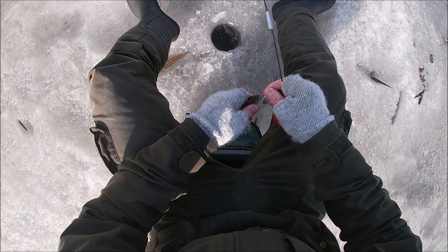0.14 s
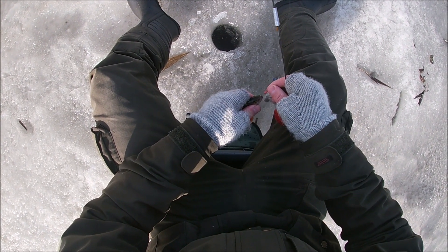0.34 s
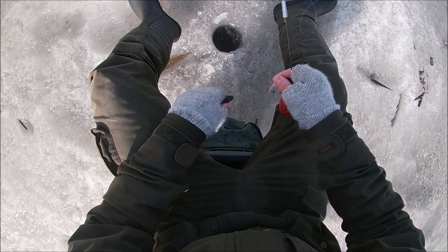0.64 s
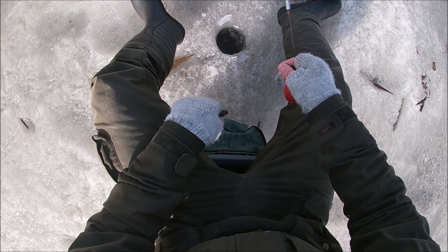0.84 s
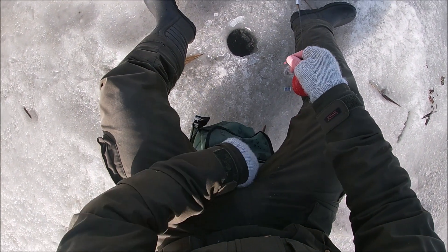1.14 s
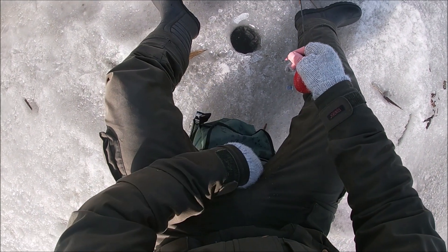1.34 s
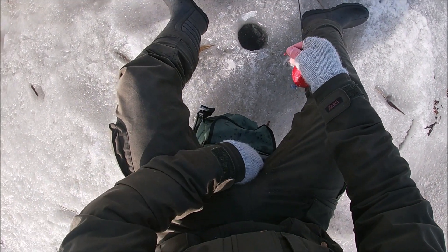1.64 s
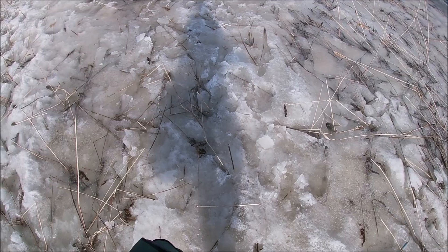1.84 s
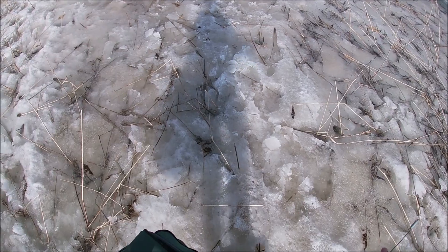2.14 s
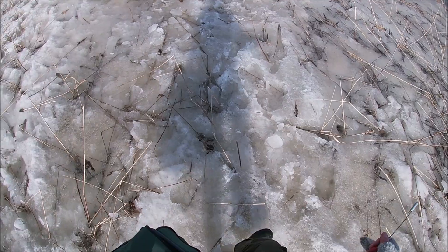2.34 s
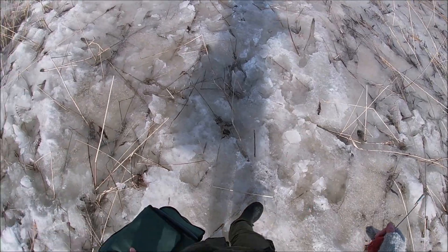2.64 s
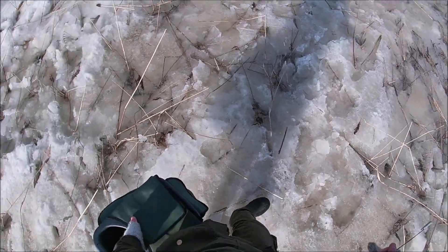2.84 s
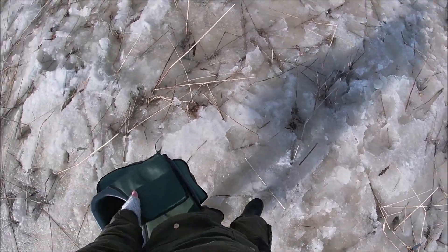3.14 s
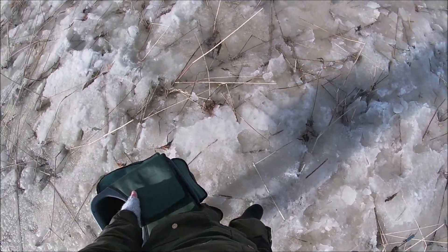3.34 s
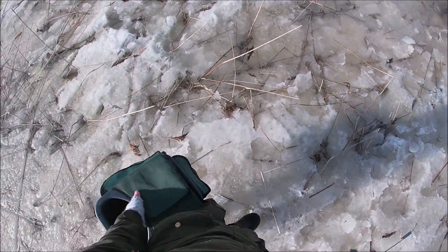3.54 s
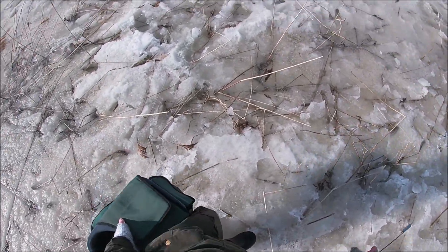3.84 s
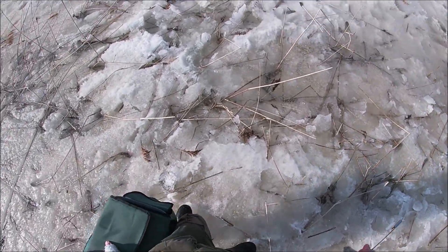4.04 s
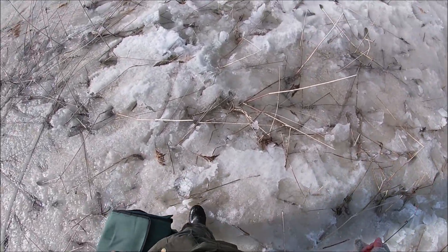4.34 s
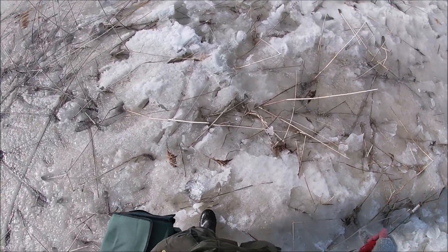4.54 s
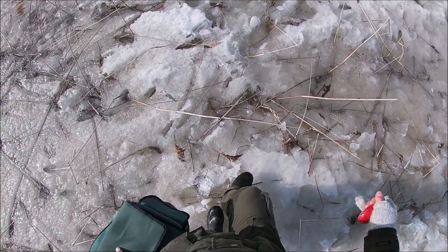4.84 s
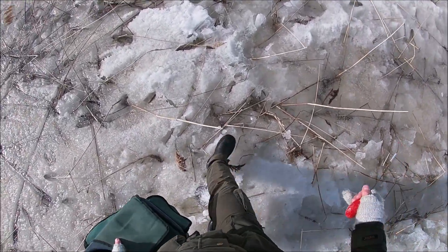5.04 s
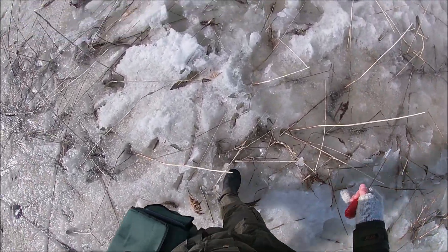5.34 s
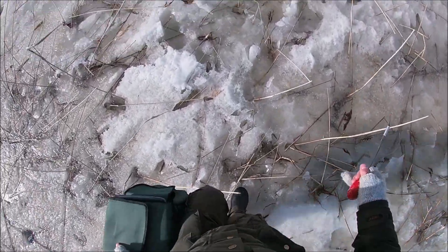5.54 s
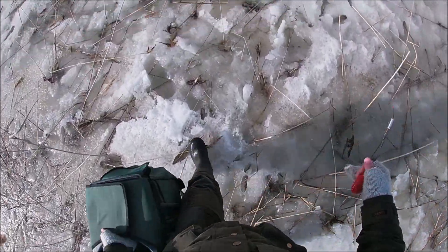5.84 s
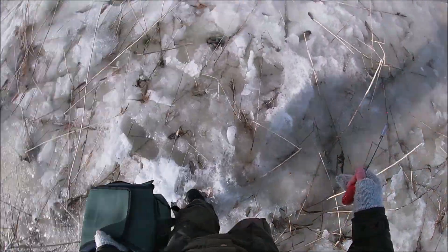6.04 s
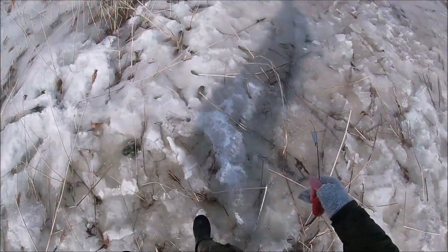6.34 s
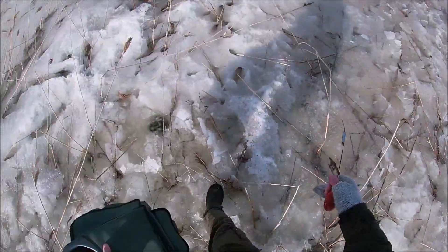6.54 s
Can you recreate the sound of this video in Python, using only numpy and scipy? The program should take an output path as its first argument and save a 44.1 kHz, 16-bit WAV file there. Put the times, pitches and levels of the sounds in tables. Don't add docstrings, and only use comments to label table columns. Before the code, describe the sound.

Close, muffled body-worn sound: soft fidgeting, a tiny gap, then low rumbling steps through crackling icy slush with rustling fabric and dull thumps.

```python
import sys
import numpy as np
from scipy import signal
from scipy.io import wavfile
from scipy.ndimage import uniform_filter1d

SR = 44100
rng = np.random.default_rng(int(sys.argv[2]) if len(sys.argv) > 2 else 0)


def amplitude_ratio(level_db):
    exponent = np.asarray(level_db, float) / 20
    return 10 ** exponent


def dump_mix(stems):
    frames = np.atleast_2d(stems).T
    limited = np.clip(frames, -1, 1)
    pcm = np.round(limited * 32767).astype(np.int16)
    wavfile.write(sys.argv[1], SR, pcm)


N = 295405
WALK_START_S = 1.764

# pitch in Hz, level in dB per Hz.
HISS_TONE = [(60, -5), (1000, -8), (1330, -1), (1700, -14), (6000, -14), (7500, -33), (9500, -19),
             (15000, -38)]
# time in seconds, peak in dB.
TICK_LEVELS = [(0, -67.5), (1.7, -70.5), (1.8, -96.5), (4, -70), (6.7, -74.5)]
# pitch in Hz, level in dB per Hz.
SLUSH_TONE = [(2500, -20.5), (3600, 1.5), (4100, 1.5), (4700, -2.5), (5200, -2.5), (6100, -6.5),
              (6800, -37), (9000, -59)]
# pitch in Hz, level in dB per Hz.
SPRAY_TONE = [(5500, -28), (7000, -3.5), (8000, 2.5), (9000, -5), (10000, -8), (11000, -14), (13000, -30),
              (15000, -57)]
# start in seconds, hold in seconds,
# crushing in dB, fine spray in dB.
CRUNCHES = [(0, 1.05, -93, -89.5), (1.1, .15, -81.5, -86), (1.3, .39, -97, -88), (1.77, .75, -77.5, -107),
            (2.46, 0.023, -74, -100), (2.7, .03, -76.5, -94), (3.225, 0.025, -73.5, -83.5),
            (3.44, .04, -73.5, -81.5), (3.48, 0.034, -67.5, -78), (3.6, .5, -80, -92.5),
            (4.18, 0.13, -75, -87), (4.34, 0.043, -70.5, -82.5), (4.47, 0.045, -67, -83),
            (4.55, .7, -82.5, -88), (5.25, .02, -68, -85), (5.275, 0.014, -52, -62),
            (5.31, 0.031, -61.5, -73), (5.38, 0.3, -74, -83), (5.535, 0.036, -68, -76),
            (5.71, .015, -72.5, -77), (5.784, 0.0077, -57, -64.5), (5.83, 0.06, -66.5, -82),
            (5.93, 0.034, -56, -67), (5.965, 0.033, -52, -62.5), (6.01, 0.053, -58, -67),
            (6.09, 0.014, -59.5, -76), (6.13, 0.11, -74.5, -84.5), (6.5, 0.004, -70, -72),
            (6.575, .13, -62, -70.5)]
# time in seconds, peak in dB, brightness in dB.
SNAPS = [(0.0696, -46, -26), (1.1029, -43.5, -39), (1.1846, -48, -19.5), (1.444, -45, -30),
         (1.4745, -43, -25), (2.2142, -34, -30), (2.6254, -48, -19), (2.75, -50, -36), (3.2284, -42.5, -19),
         (3.5019, -41, -15), (3.6895, -38.5, -13), (3.7557, -37, -14.5), (3.8273, -26, -31),
         (3.874, -26.5, -23), (4.0124, -40, -12), (4.172, -28.5, -19), (4.368, -34.5, -22),
         (4.8059, -31, -43), (5.2733, -40, -18.5), (5.2857, -27.5, -31), (5.4054, -33, -22),
         (5.5128, -30.5, -37), (5.6042, -36, -23), (5.784, -40, -5), (5.8707, -43.5, -18),
         (5.9198, -51, -16), (5.9433, -26, -26), (6.495, -50.5, -13), (6.561, -50.5, -5), (6.5808, -50, -4)]
# pitch in Hz, level in dB per Hz.
HEAVE_TONE = [(8, -45), (16, -4), (33, 6), (55, 0), (75, -23.5), (120, -45.5), (300, -68)]
# pitch in Hz, level in dB per Hz.
BUMP_TONE = [(35, -21.5), (62, -2.5), (90, -8.5), (125, -16), (200, -32.5)]
# pitch in Hz, level in dB per Hz.
SHUFFLE_TONE = [(90, -26.5), (145, 0), (220, -2), (350, -6), (520, -17), (720, -13), (880, -20.5),
                (1500, -32)]
# start in seconds, hold in seconds, heave in dB, bumps in dB.
SEATED_SHIFTS = [
    (0, 4, -46.5, -62.5),
    (.22, 0.33, -63, -51.5),
    (.64, 0.05, -39, -49.5),
    (.8, 0.027, -41, -62.5),
    (1.05, 0.024, -36, -56),
    (1.3, 0.067, -44, -58.5),
    (1.44, 0.058, -43, -45.5),
    (1.63, 0.077, -37, -42),
]
# start in seconds, hold in seconds, heave in dB, bumps in dB.
WALKING_LURCHES = [(1.745, .25, -35.5, -30.5), (2.031, .12, -30, -28.5), (2.192, 0.021, -24, -29.5),
                   (2.24, .25, -36.5, -28), (2.526, .23, -27, -28), (2.83, .13, -35.5, -51.5),
                   (3.0, 0.36, -45.5, -59.5), (3.25, 0.047, -30.5, -53), (3.438, 0.047, -26, -38),
                   (3.492, 0.087, -25, -39), (3.63, 0.39, -32.5, -37), (3.794, 0.095, -30.5, -34),
                   (3.973, .15, -40, -36), (4.158, 0.086, -31.5, -35.5), (4.295, 0.14, -27.5, -44.5),
                   (4.475, .35, -33, -44.5), (4.86, 0.16, -28.5, -39.5), (4.988, 0.17, -47, -42),
                   (5.176, 0.05, -23, -41), (5.299, 0.13, -20.5, -36.5), (5.45, 0.25, -39, -48.5),
                   (5.602, 0.038, -32.5, -46), (5.734, 0.035, -45, -43.5), (5.799, .05, -19.5, -43.5),
                   (5.935, 0.065, -18, -32.5), (6.011, .08, -18.5, -37), (6.168, 0.073, -29.5, -43),
                   (6.27, 0.33, -46, -69), (6.606, 0.059, -17, -47.5)]
# time in seconds, peak in dB, ring in Hz (negative is a pull),
# time to fall by 60 dB in seconds, tick of the contact in dB.
BAG_KNOCKS = [(1.4284, -34, -750, .012, -52), (1.429, -34, 170, .03, -60), (3.4762, -12, -62, .05, -60),
              (3.4832, -31, -600, .035, -48), (3.4858, -5, 165, .022, -50), (3.4895, -13, -65, .04, -60),
              (6.1099, -3, 460, .008, -29), (6.1106, -9, -130, .045, -34), (6.1165, -21, -200, .06, -46),
              (6.2252, -19, -520, .03, -36), (6.2274, -1, 175, .016, -30), (6.2305, -5, -170, .014, -36),
              (6.2313, -20, -700, .018, -42)]
# pitch in Hz, width in Hz, level in dB.
CAVITY_MODES = [(1323.5, 193, 4), (1502, 270, -8), (2024, 170, -19.5)]
# pitch in Hz, width in Hz, level in dB.
LID_MODES = [(1026, 135, 4.5), (1122, 92, 0.5), (2163, 130, -27)]
# pitch in Hz, width in Hz, level in dB.
UPPER_MODES = [(1960, 200, -10.5), (2435, 290, -4), (2935, 330, 2.5), (3320, 280, -11), (4180, 400, -17.5)]
# start in seconds, hold in seconds, drag on the cavity in dB,
# press on the lid in dB, scratch in dB.
SEATED_FIDGETS = [
    (0, 3.3, -67.5, -91, -105),
    (.25, .01, -72, -71, -86),
    (.7, 0.011, -58.5, -71, -89),
    (1.1, 0.027, -61, -57.5, -78),
    (1.16, 0.18, -66, -83, -81),
    (1.44, 0.058, -68, -69, -82),
    (1.62, 0.041, -58, -60, -88),
    (1.685, 0.012, -48.5, -51, -77),
]
# start in seconds, hold in seconds, drag on the cavity in dB,
# press on the lid in dB, scratch in dB.
WALKING_RUBS = [(1.778, 0.46, -47.5, -42, -58), (2.276, 0.255, -48.5, -40, -55.5),
                (2.549, 0.19, -61, -43, -61), (3.224, 0.007, -60.5, -55, -76),
                (3.437, 0.1, -56.5, -68, -72.5), (3.579, 0.087, -56, -50.5, -64.5),
                (3.696, .09, -52, -45.5, -62.5), (3.794, .16, -48, -43.5, -58.5),
                (4.015, 0.066, -49.5, -47, -65), (4.117, .24, -51, -49, -64),
                (4.4, 0.15, -55.5, -56, -71.5), (4.566, 0.42, -58, -62.5, -77),
                (4.722, .18, -52.5, -48, -84), (4.927, 0.093, -45.5, -43.5, -67.5),
                (5.068, 0.08, -51.5, -51, -75), (5.16, .1, -45.5, -42.5, -68),
                (5.275, 0.021, -34.5, -40, -48.5), (5.318, 0.05, -45, -47.5, -56),
                (5.412, 0.17, -49.5, -47.5, -71), (5.638, 0.54, -53, -54.5, -74),
                (5.933, 0.12, -38.5, -45, -47.5), (6.103, 0.14, -57, -67, -70), (6.266, .29, -66, -72, -82),
                (6.591, 0.22, -43.5, -63, -55)]
# start in seconds, hold in seconds, level in dB.
STRAP_SLIDES = [
    (1.764, .5, -47),
    (2.27, 0.476, -46.5),
]
# cut in seconds, end of its faint smear in seconds, return in seconds.
DROPOUT = (1.6948, 1.728, 1.7632)


def evened(x):
    return x / np.sqrt(np.mean(x ** 2) + 1e-20)


def summed(*levels_db):
    return 10 * np.log10(sum(amplitude_ratio(2 * np.asarray(db)) for db in levels_db))


def coloured(x, shape):
    hz = abs(np.fft.fftfreq(8192, 1 / SR)) + 1
    if len(shape[0]) == 2:
        shape_hz, shape_db = np.transpose(shape)
        db = np.interp(np.log(hz), np.log(shape_hz), shape_db, left=-70, right=-90)
    else:
        peaks = [amplitude_ratio(2 * d) / (1 + (2 * (hz - f) / width) ** 2) ** 2.12 for f, width, d in shape]
        db = 10 * np.log10(sum(peaks))
        db -= 10 * np.log10(1 + (hz / (2.1 * shape[-1][0])) ** 8)
    log_gain = np.maximum(db, -100) * np.log(10) / 20
    taps = np.fft.ifft(np.exp(np.conj(signal.hilbert(log_gain)))).real[:4096]
    return signal.oaconvolve(x, taps / np.linalg.norm(taps))[:N]


def flicker(seconds):
    size = max(round(seconds * SR), 2)
    smooth = uniform_filter1d(rng.standard_normal(N), size)
    return evened(uniform_filter1d(smooth, size))


def grains(per_s, spread_db):
    size_db = spread_db * np.minimum(rng.exponential(1, N), 4)
    size = amplitude_ratio(size_db) * rng.choice([-1, 1], N)
    return size * (rng.random(N) < per_s / SR)


def catching(x, grip_db):
    return evened(x * amplitude_ratio(grip_db))


def bursts(times, levels_db, t60, rise=0.00048):
    out, t = np.zeros(N), np.arange(2400) / SR
    puffs = rng.standard_normal((len(times), len(t)))
    for s, db, puff in zip(times, levels_db, puffs):
        swell = np.minimum(t / rise, 1)
        part = out[round(s * SR):][:len(t)]
        part += (puff * amplitude_ratio(db - 60 * t / t60) * swell)[:len(part)]
    return out


def effort(rows, rise, fall, rest_db):
    t = np.arange(0, N + 64, 64) / SR
    s, hold, *columns = np.array(rows).T[:, :, None]
    away_db = rise * np.maximum(s - t, 0) + fall * np.maximum(t - s - hold, 0)
    levels = []
    for db, rest in zip(columns, rest_db):
        level = summed(rest, *(db - away_db))
        levels.append(np.interp(np.arange(N) / SR, t, level))
    return levels


def electronics(shuffle_db):
    s = np.arange(.0135, N / SR, 1001 / 30000)
    db = np.interp(s, *np.transpose(TICK_LEVELS)) + 2.5 * rng.standard_normal(len(s))
    tick_modes = [(6460, 900, -8.5), (8300, 510, -11.5), (9600, 1000, -10)]  # Hz, width Hz, dB
    ticks = coloured(bursts(s, db, t60=0.011), tick_modes)
    t = np.arange(N) / SR
    hiss_db = -74 + np.where(t > WALK_START_S, -6., 0)
    fall_db = 32.5 * t
    held_db = np.maximum.accumulate(shuffle_db + fall_db) - fall_db
    hiss_db -= 0.88 * np.maximum(held_db + 48.5, 0)
    return amplitude_ratio(hiss_db) * coloured(rng.standard_normal(N), HISS_TONE) + ticks


def body(grip, heave_db, bump_db, shuffle_db):
    heave = catching(rng.standard_normal(N), 3.9 * flicker(0.13))
    bump = catching(rng.standard_normal(N), .5 * grip + 0.88 * flicker(0.026))
    shuffle = catching(rng.standard_normal(N), 0.27 * grip + 1.6 * flicker(0.011))
    out = amplitude_ratio(heave_db) * coloured(heave, HEAVE_TONE)
    out += amplitude_ratio(bump_db) * coloured(bump, BUMP_TONE)
    return out + amplitude_ratio(shuffle_db) * coloured(shuffle, SHUFFLE_TONE)


def knocks():
    out, t = np.zeros(N), np.arange(6000) / SR
    for s, db, hz, t60, _ in BAG_KNOCKS:
        onset = np.minimum(t * abs(hz) / .3, 1)
        swing = -np.sin(2 * np.pi * hz * t) * amplitude_ratio(db + 4.5 - 60 * t / t60) * onset
        out[round(s * SR):][:len(t)] += swing
    out = signal.lfilter(*signal.butter(2, 2000 / (SR / 2)), out)
    s, tick_db = np.transpose(BAG_KNOCKS)[[0, 4]]
    tick_tone = [(300, 1), (1300, 7), (2500, -12.5), (5000, -33.5), (10000, -42.5), (13000, -76)]  # Hz, dB
    return out + coloured(bursts(s, tick_db, t60=0.031), tick_tone)


def snaps():
    s, db, bright_db = np.transpose(SNAPS)
    dull = coloured(bursts(s, db - 0.5, t60=0.022, rise=0.00059), CAVITY_MODES + LID_MODES)
    sharp = bursts(s, db + bright_db - .5, t60=0.047, rise=0.001)
    return dull + coloured(sharp, UPPER_MODES) + amplitude_ratio(-16.5) * coloured(sharp, SLUSH_TONE)


def slush(grip, crush_db, spray_db):
    crackle = catching(grains(per_s=6000., spread_db=3.1), .7 * grip + 1.3 * flicker(.004))
    crush = amplitude_ratio(crush_db) * coloured(crackle, SLUSH_TONE)
    return crush + amplitude_ratio(spray_db) * coloured(crackle, SPRAY_TONE)


def cloth(grip, drag_db, press_db, scratch_db):
    slips = catching(grains(per_s=5000., spread_db=3.0), 0.49 * grip)
    strap_db = effort(STRAP_SLIDES, rise=650, fall=313, rest_db=[-85])[0]
    strap_db = summed(strap_db, press_db - 14.5)
    out = amplitude_ratio(strap_db) * coloured(slips, [(712, 260, 0)])
    out += amplitude_ratio(drag_db) * coloured(slips, CAVITY_MODES)
    out += amplitude_ratio(press_db) * coloured(slips, LID_MODES)
    return out + amplitude_ratio(scratch_db) * coloured(slips, UPPER_MODES)


def scene():
    grip = 2.5 * flicker(0.0094) + 1.85 * flicker(0.0076)
    heave, bump = effort(SEATED_SHIFTS + WALKING_LURCHES, rise=380, fall=330, rest_db=[-56, -70])
    drag, press, scratch = effort(SEATED_FIDGETS + WALKING_RUBS, rise=650, fall=313,
                                  rest_db=[-79, -80, -90])
    crush, spray = effort(CRUNCHES, rise=1100, fall=450, rest_db=[-94, -105])
    shuffle = summed(bump - 11.5, press - 6, -67.5)
    scratch = summed(scratch, crush + 1)
    out = electronics(shuffle) + body(grip, heave, bump, shuffle) + knocks() + snaps()
    out += slush(grip, crush, spray) + cloth(grip, drag, press, scratch)
    return out[None]


def band_limit(x):
    return signal.sosfilt(signal.butter(12, 14900, fs=SR, output="sos"), x)


def record(dry):
    t = np.arange(N) / SR
    cut_s, smear_end_s, return_s = DROPOUT
    smear_db = np.interp(t, [cut_s, smear_end_s], [-68, -84])
    smear_tone = [(30, -36), (1300, -3), (2500, -14.5), (14000, -27)]  # Hz, dB per Hz
    smear = amplitude_ratio(smear_db) * coloured(rng.standard_normal(N), smear_tone)
    joined = np.where((t > cut_s) & (t < return_s), smear * (t < smear_end_s), dry)
    joined = joined * np.minimum((N - np.arange(N)) / 200, 1)
    return band_limit(joined)


dry = scene()
out = record(dry)
dump_mix(out)
```